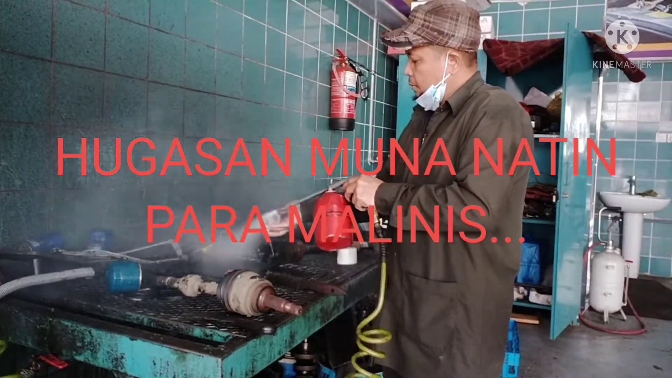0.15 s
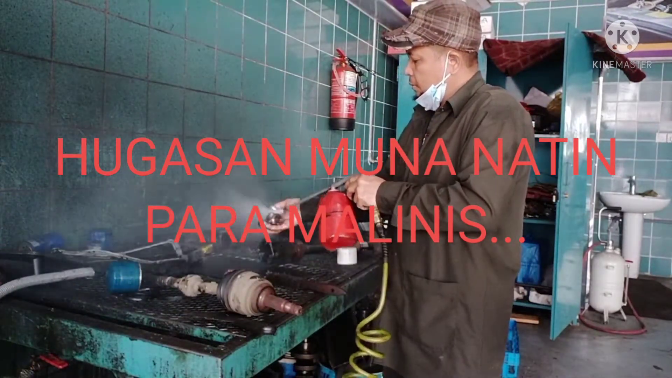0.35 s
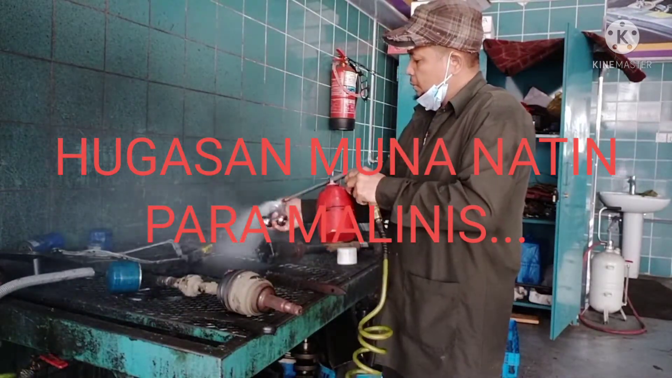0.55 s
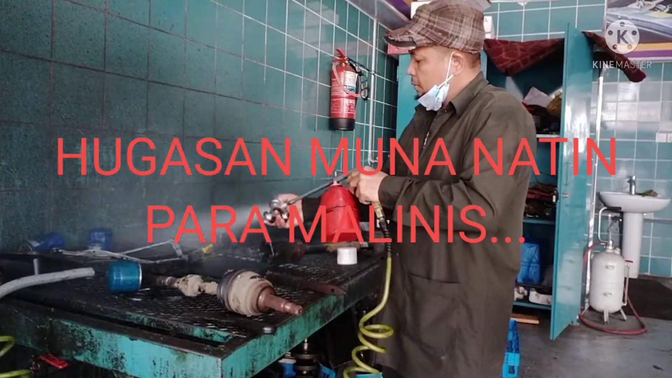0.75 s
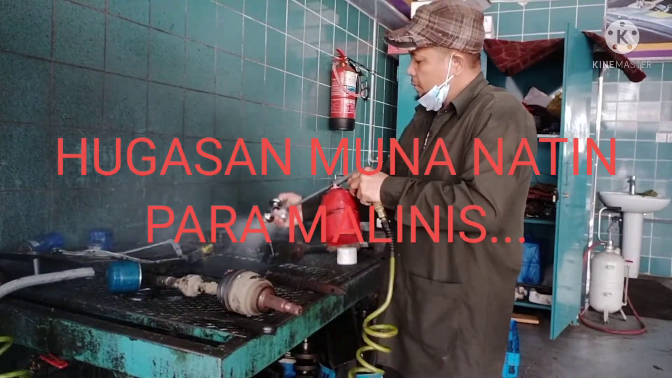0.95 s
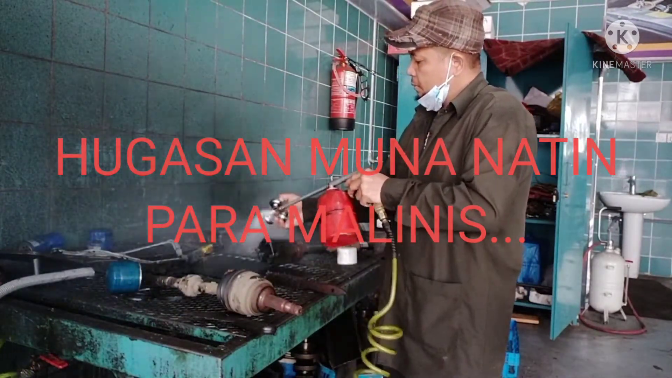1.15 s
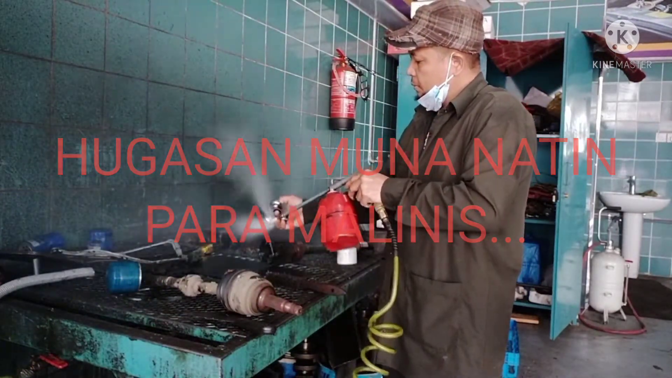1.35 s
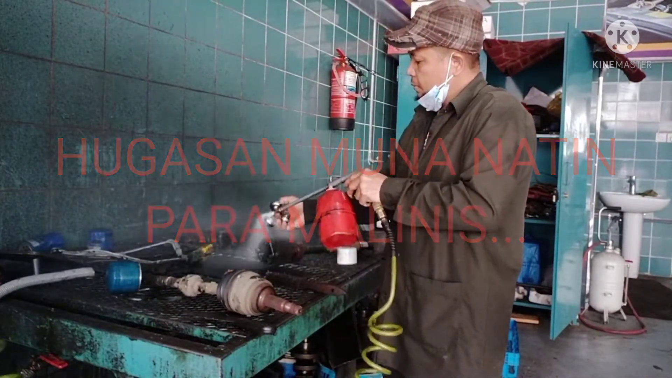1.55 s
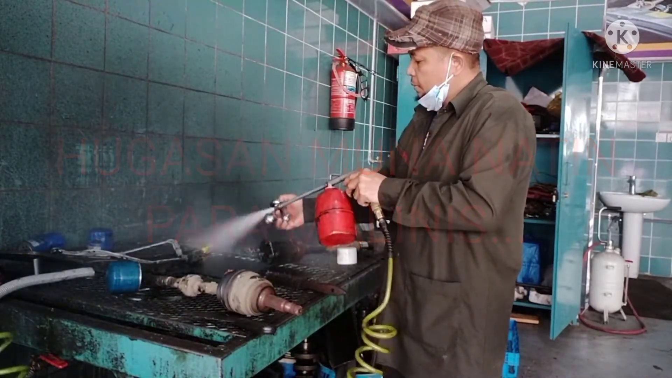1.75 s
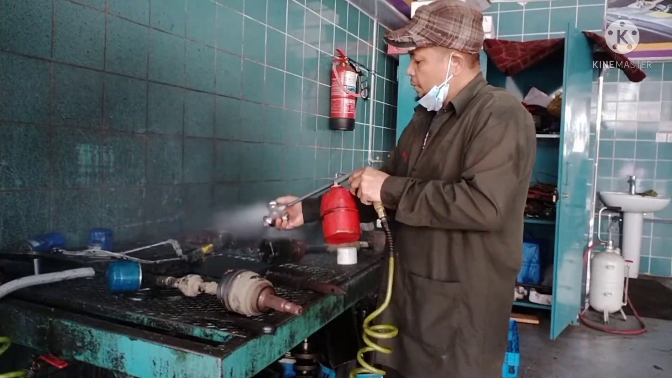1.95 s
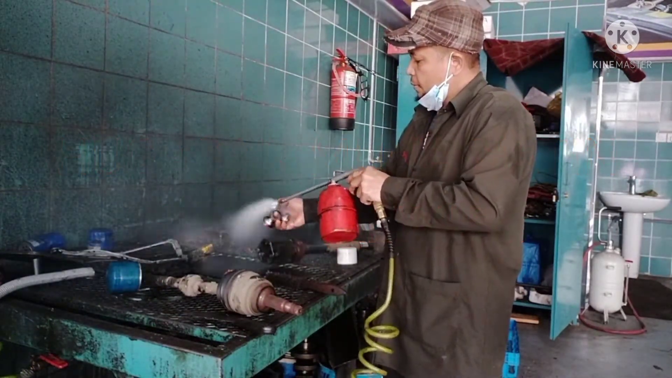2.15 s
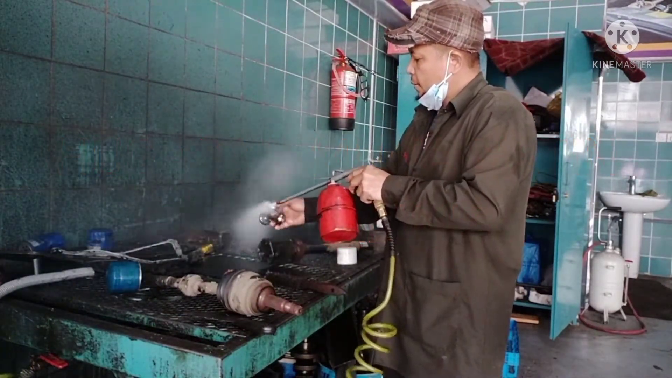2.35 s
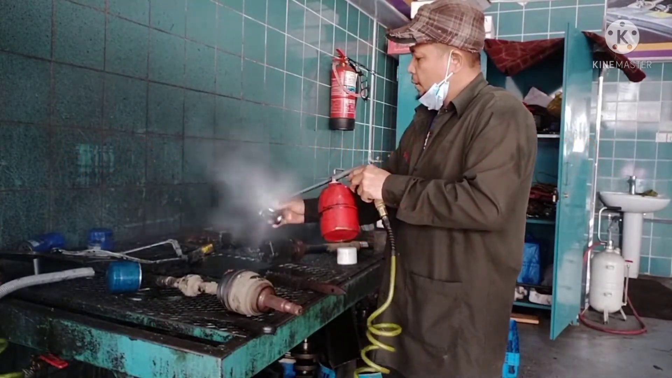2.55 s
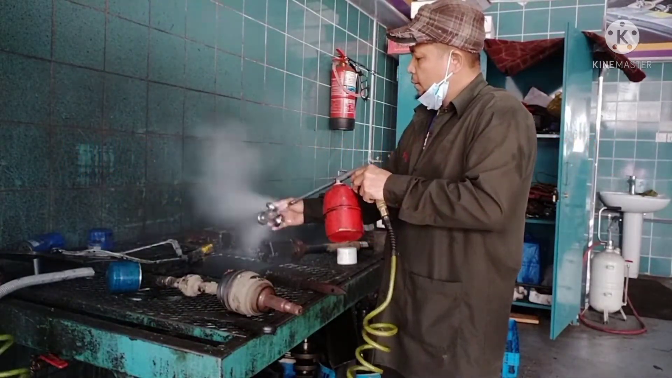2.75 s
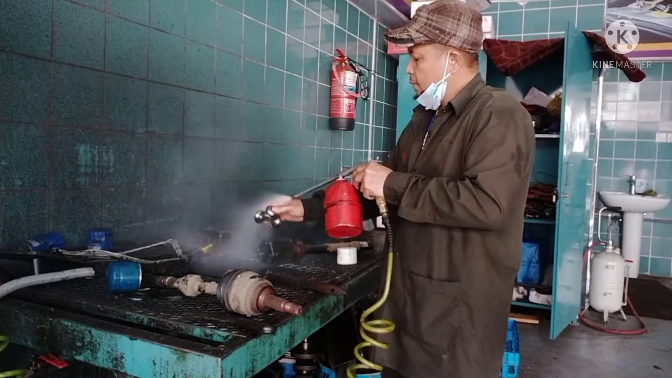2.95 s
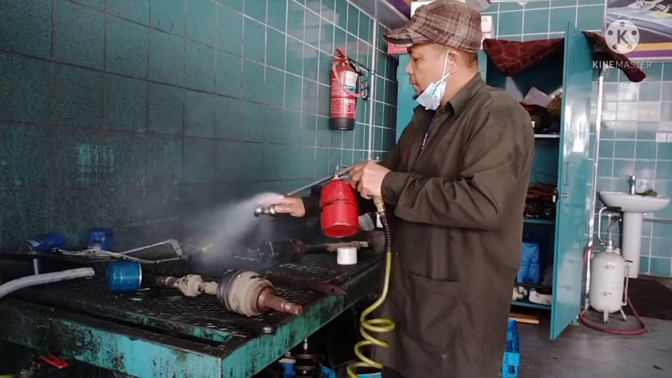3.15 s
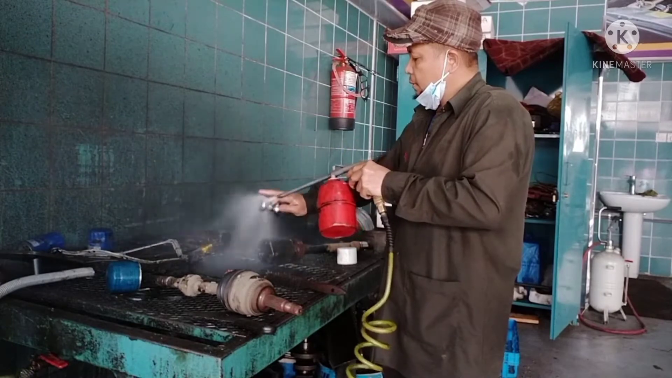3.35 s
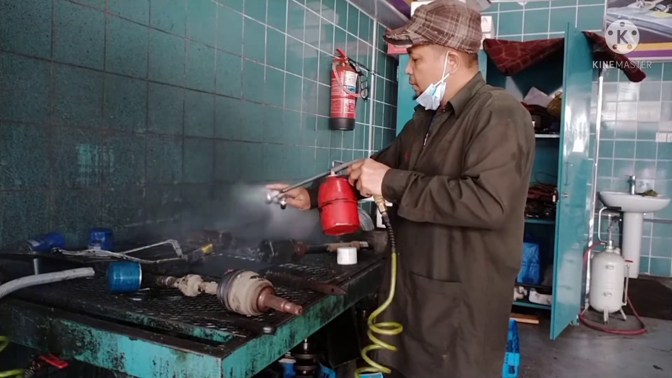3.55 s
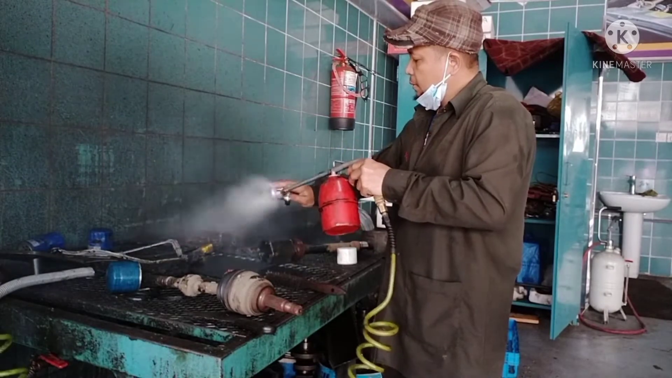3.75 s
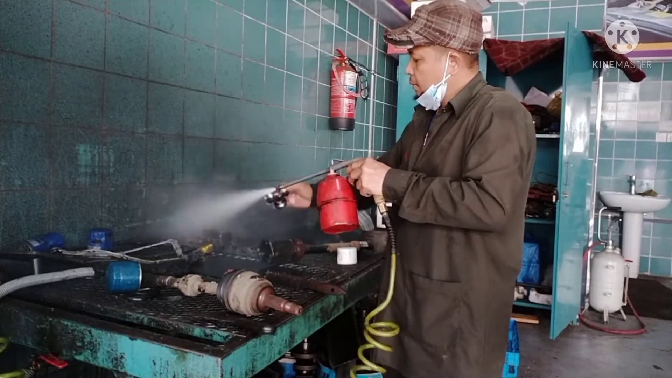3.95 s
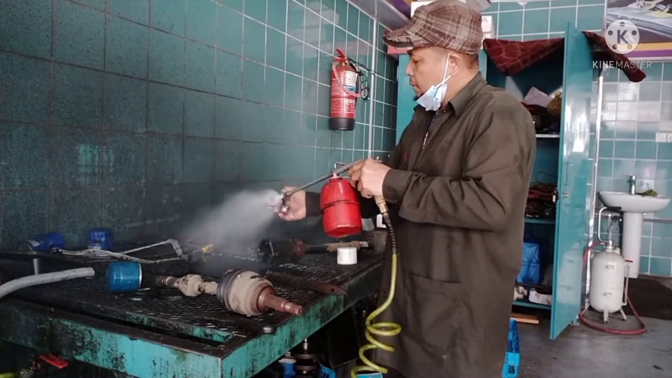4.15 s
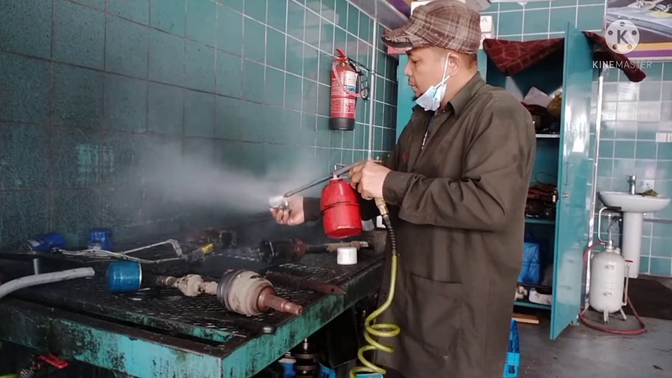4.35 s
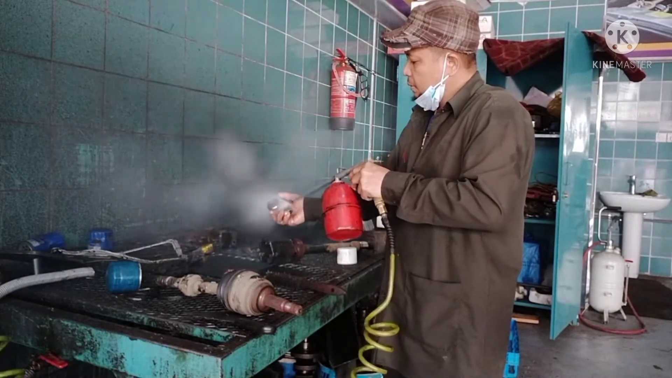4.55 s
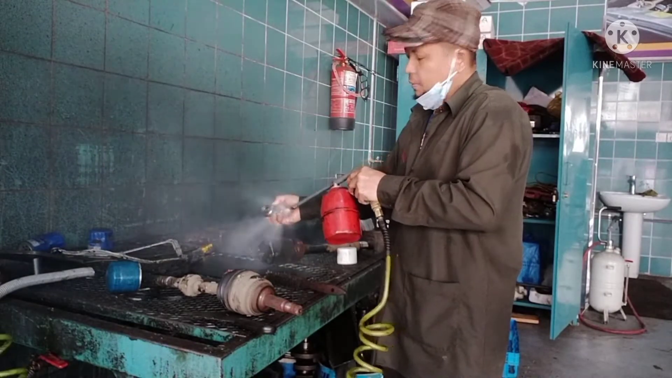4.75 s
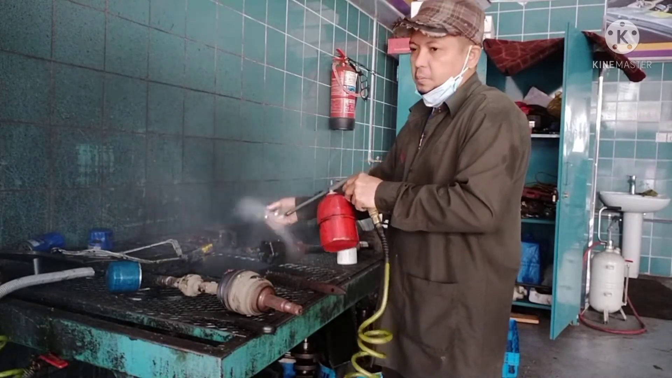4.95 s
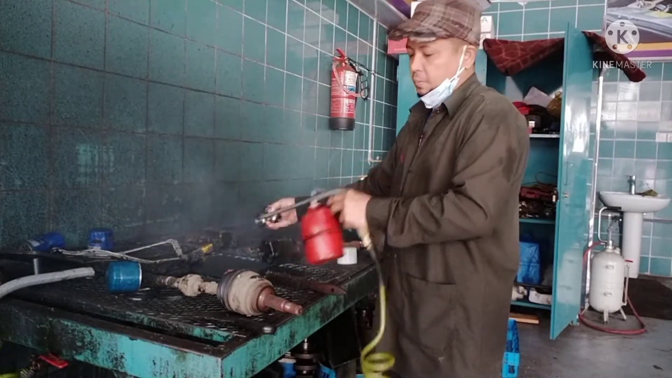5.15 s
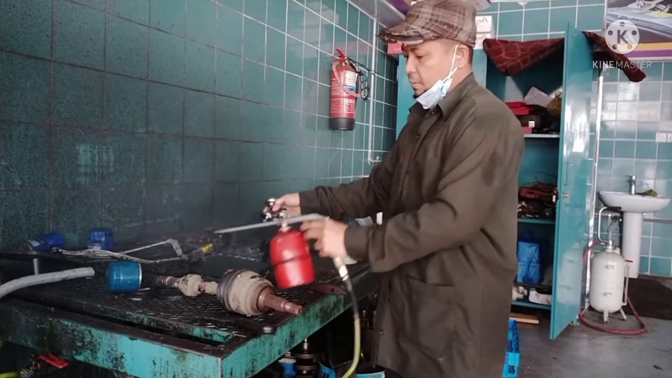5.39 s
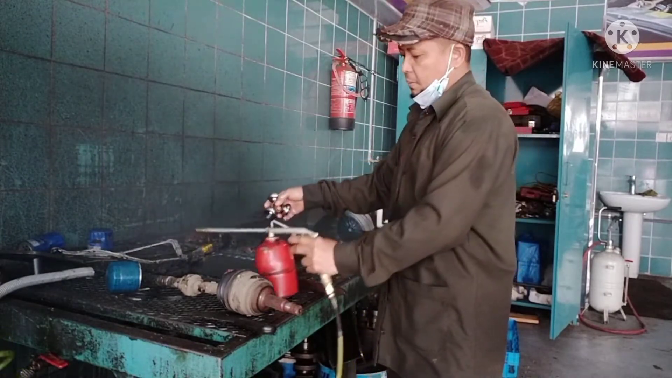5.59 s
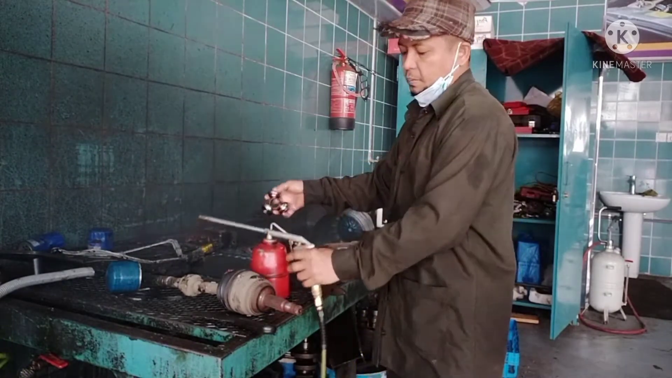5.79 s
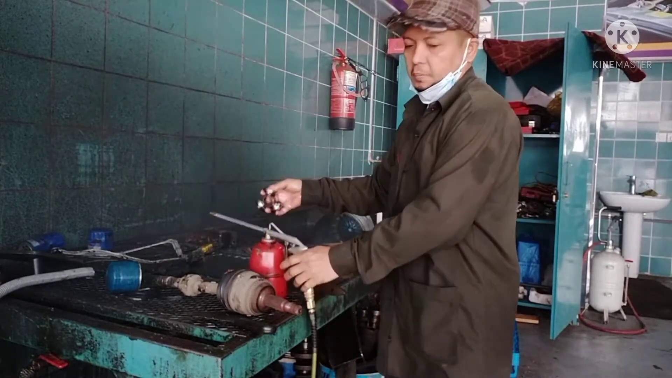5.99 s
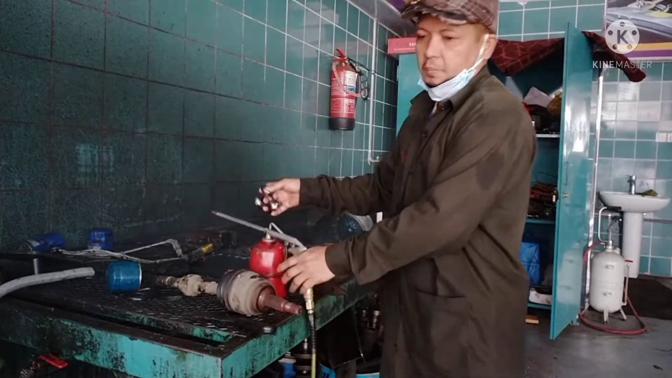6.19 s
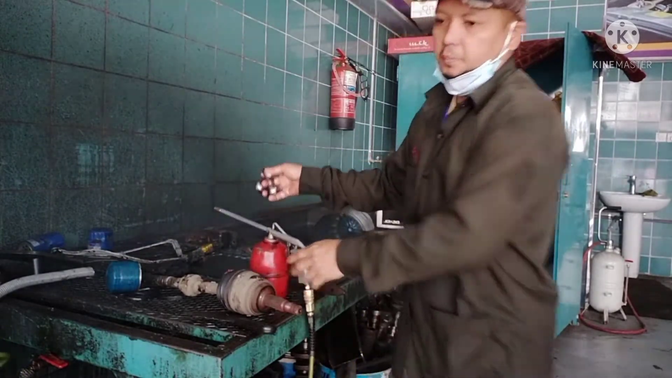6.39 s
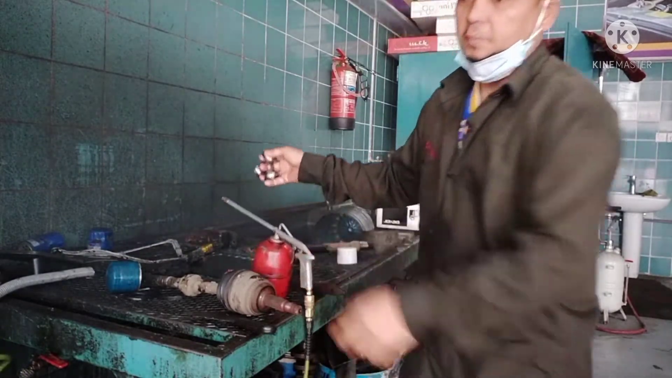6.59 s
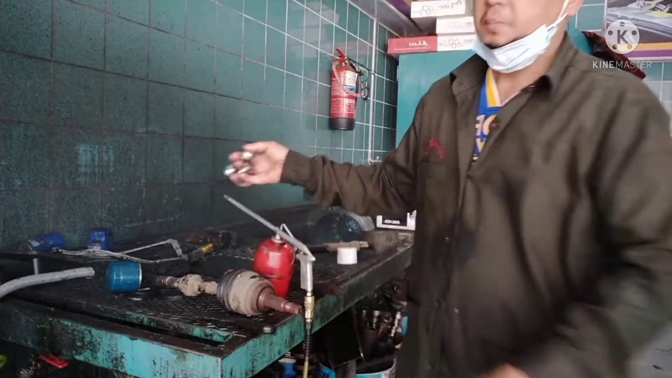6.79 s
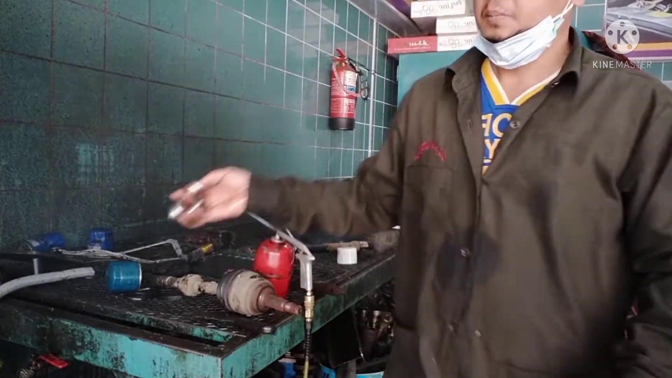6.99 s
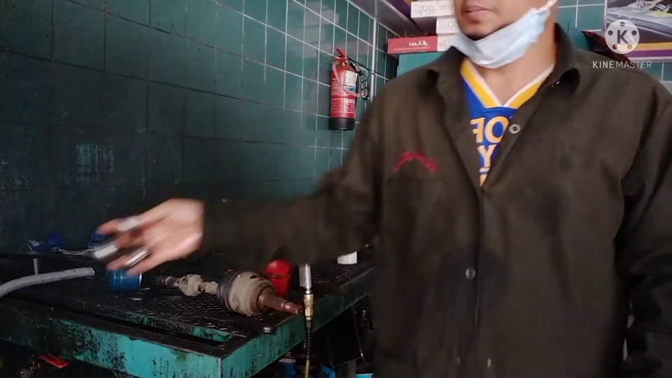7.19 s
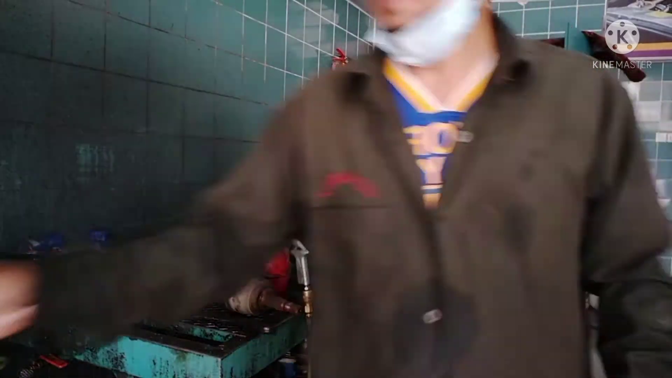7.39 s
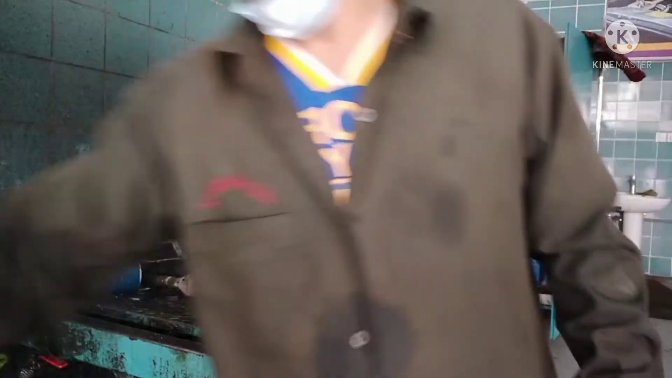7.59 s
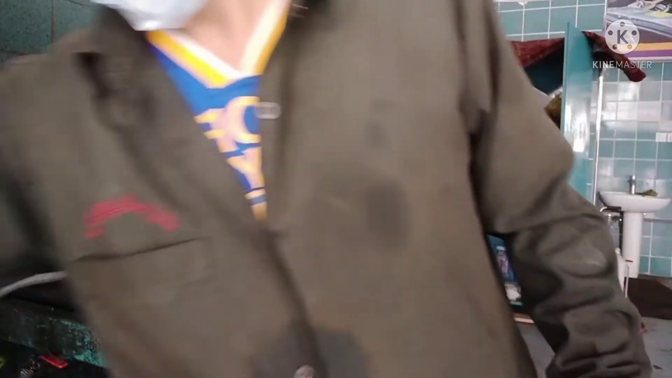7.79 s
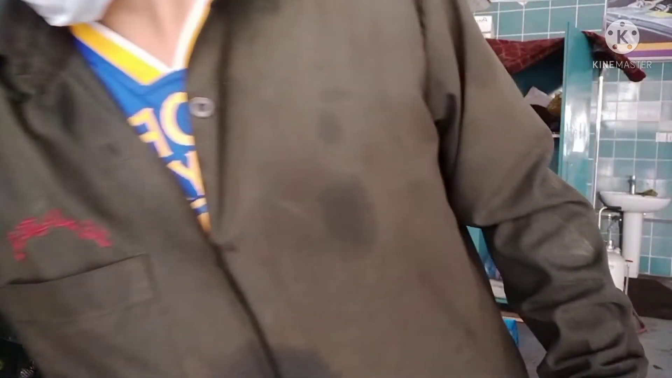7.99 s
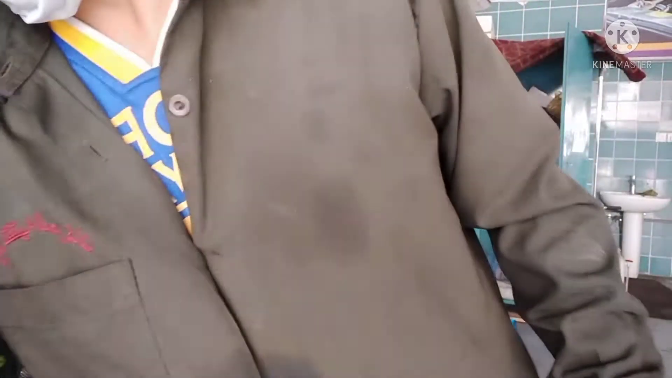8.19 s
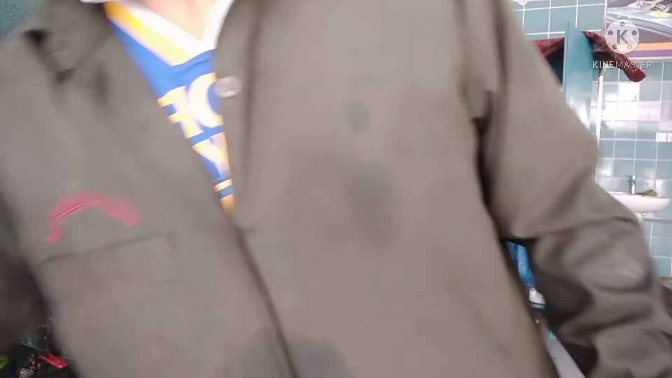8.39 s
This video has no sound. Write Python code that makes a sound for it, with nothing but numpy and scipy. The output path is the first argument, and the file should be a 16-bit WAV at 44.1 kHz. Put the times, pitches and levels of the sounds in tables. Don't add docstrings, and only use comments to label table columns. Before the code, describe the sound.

From the very start a compressed-air gun sprays liquid over small metal parts, close to the microphone in a tiled workshop. A loud, rough, broad roar carries a bright hiss on top. It flutters constantly, with quick dips as the jet slips off the parts, brief breathy howls from hollows, and hard droplet smacks, notably near 0.3, 1.7, 2.2 to 2.6 and 3.7 s. Around 3 s the roar thins for a moment, then surges again. At 4.9 to 5.2 s the trigger is released: a low, hollow puff booms through the hose and the roar collapses by about 5.7 s. A much quieter, thin, high leak hiss stays, with a faint fading whistle and slight wall echo over dull room air. Small spits swell and stop at 6.4 and 7.0 s. The hiss then turns slightly coloured by a nearby body, and a faint low motor hum rises and fades at 7.5 to 8.3 s.

```python
import sys
import numpy as np
from scipy import signal
from scipy.fft import rfft, irfft, next_fast_len
from scipy.io import wavfile
from scipy.ndimage import uniform_filter1d, map_coordinates

SR = 44100
rng = np.random.default_rng(int(sys.argv[2]) if len(sys.argv) > 2 else 0)


def generate_wav(signal):
    frames = np.transpose(np.atleast_2d(signal))
    scaled = np.clip(frames, -1, 1) * 32767
    pcm = np.round(scaled).astype(np.int16)
    wavfile.write(sys.argv[1], SR, pcm)


def gain_from_db(level_db):
    decades = np.asarray(level_db, float) / 20
    return 10 ** decades


N = 371763


def in_time(rows):
    seconds, *columns = np.transpose(rows)
    return [np.interp(np.arange(N) / SR, seconds, column) for column in columns]


def rms_one(x):
    return x / np.sqrt(np.mean(x ** 2) + 1e-20)


def drift(rate_hz):
    pole = np.exp(-40 * np.pi * rate_hz / SR)
    draws = rng.standard_normal(N // 20 + 3002)
    slow = signal.lfilter([1], [1, -2 * pole, pole ** 2], draws)[3000:]
    return np.interp(np.arange(N) / 20, np.arange(len(slow)), rms_one(slow))


def resonate(x, hz, width_hz):
    radius = np.exp(-np.pi * width_hz / SR)
    feed = np.array([1, 0, -1]) * (1 - radius ** 2) / 2
    return signal.lfilter(feed, [1, -2 * radius * np.cos(2 * np.pi * hz / SR), radius ** 2], x)


def bumps(rows):
    t, out_db = np.arange(N) / SR, np.zeros(N)
    for s, db, length in rows:
        near = slice(max(int((s - 2 * length) * SR), 0), int((s + 2 * length) * SR))
        out_db[near] += db * np.exp(-4 * np.log(2) * ((t[near] - s) / length) ** 2)
    return out_db


def air_noise(colour, tilt_hz, tilts_db, patchy_db, patch_rate, count):
    size = next_fast_len(N)
    log_hz = np.log(np.arange(size // 2 + 1) * SR / size + 1)
    hz, colour_db = np.transpose(colour)
    spectrum = rfft(rng.standard_normal(size)) * gain_from_db(np.interp(log_hz, np.log(hz), colour_db, -90))
    spectrum /= np.std(irfft(spectrum, size))
    centres = np.linspace(np.log(hz[0]), np.log(hz[-1]), count)
    out = np.zeros(N)
    for k, centre in enumerate(centres):
        triangle = np.interp(log_hz, centres, np.arange(count) == k)
        band = irfft(spectrum * triangle, size)[:N]
        shares = [np.interp(centre, np.log(tilt_hz), row) for row in np.eye(len(tilt_hz))]
        tilt_db = sum(share * (curve - np.mean(curve)) for share, curve in zip(shares, tilts_db))
        out += band * gain_from_db(tilt_db + patchy_db * drift(patch_rate))
    return out


# frequency in Hz, density in dB per Hz.
ROAR_COLOUR = [(15, -31), (25, 5), (38, -5), (291, -3.5), (565, -2), (2240, 1.5), (2880, 0), (5230, -10.5),
               (6000, -11), (7800, -14.5), (13200, -120)]
# time in seconds, roar level in dB, edge sharpness in dB.
STRIKE = [(0, -30.5, -1), (.2, -27.5, -0.5), (.5, -34, -1.5), (.63, -29, 0), (1.0, -32, 1.5),
          (1.38, -30, -1.5), (1.85, -28.5, -3), (2.15, -33.5, -0.5), (2.5, -29.5, -1), (2.95, -38.5, 3),
          (3.15, -35.5, 1.5), (3.3, -31.5, -0.5), (3.72, -27, -4), (4.3, -31, 1), (4.7, -31.5, 0.5),
          (5.05, -32.5, 0.5), (5.3, -38, -8), (5.75, -66.5, 21)]
# centre in seconds, depth in dB, length in seconds.
SLIPS = [(0.152, 5.5, 0.076), (0.481, 1.5, 0.24), (0.545, 1.5, 0.04), (0.867, 10, 0.049), (0.968, 3, 0.032),
         (1.076, 2, 0.028), (1.184, 2.5, 0.074), (1.46, 1.5, 0.06), (1.547, 3.5, 0.049), (1.66, 6.5, 0.091),
         (1.765, 3.5, 0.037), (2.07, 4, 0.1), (2.283, 2.0, 0.015), (2.371, 6.5, 0.048), (2.588, 8.5, 0.044),
         (2.712, 4.5, 0.022), (2.752, 4, 0.033), (2.862, 8, 0.049), (2.935, 10, 0.038), (3.108, 10, 0.07),
         (3.513, 6, 0.068), (3.63, 4, 0.12), (3.825, 9.5, 0.1), (4.008, 4, 0.14), (4.256, 1.5, 0.036),
         (4.563, 1.5, 0.081), (4.745, 0.5, 0.03), (4.812, 3, 0.039), (4.914, 4.5, 0.046)]
# centre in seconds, loss in dB, length in seconds.
SHADES = [(0.42, 3, 0.27), (0.698, 2.9, 0.048), (0.871, 3.7, 0.036), (0.957, 5.0, 0.027), (1.154, 3, 0.057),
          (1.289, 3.1, 0.063), (1.53, 2.5, 0.061), (1.657, 0, 0.029), (1.932, 6, 0.062), (2.063, 3, 0.057),
          (2.603, 1.5, 0.055), (2.712, 3, 0.019), (2.91, 7, 0.1), (3.101, 5, 0.11), (3.173, 11, 0.02),
          (3.467, 5, 0.043), (3.585, 2.8, 0.037), (3.808, 0.5, 0.16), (4.002, 4.5, 0.094),
          (4.382, -0.5, 0.046), (4.523, 3.5, 0.122), (5.3, 5.5, 0.19), (7.75, 2, 0.1), (8.02, 2.5, 0.06)]
SLIP_SHARES = {"rumble": 0.23, "upper": -0.43, "bright": -0.72, "five": 0.17, "eight": 0.13, "top": .13,
               "room": 0.55}
EDGE_SHARES = {"rumble": -0.34, "upper": 0.6, "bright": 1.16}
SHADE_SHARES = {"bright": 0.23, "five": 1.7, "eight": 0.78, "top": 0.19}


def splash():
    roar_db, edge_db = in_time(STRIKE + [(6.1, -56, 0)])
    slip_db = 1.39 * bumps(SLIPS)
    lumps_db = 0.5 * drift(45) + 1.5 * drift(210)
    rumble_db, upper_db, bright_db = (EDGE_SHARES[part] * edge_db - SLIP_SHARES[part] * slip_db
                                      for part in ("rumble", "upper", "bright"))
    bright_db = bright_db - SHADE_SHARES["bright"] * bumps(SHADES)
    noise = air_noise(ROAR_COLOUR, [250, 1100, 2600, 3900], [rumble_db, np.zeros(N), upper_db, bright_db],
                      patchy_db=1.04, patch_rate=7.6, count=22)
    return gain_from_db(roar_db - slip_db + 1.0 + lumps_db) * noise


def echo(x, rows, above_hz):
    path_ms, strength = in_time(rows)
    highs = signal.lfilter(*signal.butter(1, above_hz, "high", fs=SR), x)
    late = map_coordinates(highs, [np.arange(N) - path_ms * SR / 1000], order=3)
    return (x + strength * late) / np.sqrt(1 + strength ** 2)


# frequency in Hz, density in dB per Hz.
HISS_COLOUR = [(2180, -19), (3700, -17.5), (4380, -15.5), (5400, -18.5), (6610, -14.5), (7190, -11),
               (7770, -8.5), (8400, -6.5), (9140, -11), (10200, -9.5), (12000, -9), (14900, -2),
               (15500, -2)]
# time in seconds, hiss level in dB, aim at the microphone in dB.
NOZZLE = [(0, -28.5, -0.5), (.4, -28, -0.5), (.75, -30, 2.5), (1.15, -29, -2.5), (1.8, -29.5, 2.5),
          (2.1, -28.5, -1), (2.95, -30, 0.5), (3.3, -28.5, -0.5), (4.9, -29, 0.5), (4.95, -35.5, 2),
          (5.1, -33, -2.5), (5.32, -32, -1), (5.5, -32.5, -1.5), (5.9, -33.5, -4), (6.95, -33.5, -3.5),
          (7.1, -35.5, -3.5), (7.36, -33.5, -3.5), (8.43, -34.5, -4)]
AIM_SHARES = {"five": 1.63, "eight": 1.16}
# centre in seconds, gain in dB, length in seconds.
FLICKS = [(0.09, 2.5, 0.042), (0.238, 1.9, 0.045), (0.364, 1, 0.054), (0.488, 1, 0.039), (0.809, 1, 0.04),
          (0.9, 1, 0.036), (1.012, 2.0, 0.066), (1.227, 1, 0.029), (1.336, 2, 0.13), (1.84, 1.5, 0.041),
          (2.317, 1, 0.1), (2.792, 1.5, 0.1), (3.0, 0.5, 0.057), (3.215, -1, 0.023), (3.442, 1.5, 0.088),
          (3.543, 0, 0.046), (4.04, 1, 0.043), (4.15, 3, 0.052), (4.436, 2.5, 0.041), (4.626, 3, 0.067),
          (4.748, 1, 0.048), (5.56, 1.5, 0.15), (6.165, 1.5, 0.055), (6.587, 1.9, 0.13), (7.364, 2.2, 0.03),
          (7.52, 1, 0.19), (7.906, 1, 0.056)]
# time in seconds, extra path in milliseconds, strength 0 to 1.
HAND_ECHO = [(0, 0.25, 0.07), (1.5, 1, 0.06), (3.3, 0.27, 0.15), (4.6, 0.61, 0), (5.2, 0.6, 0),
             (6.5, 0.53, 0.07), (7.05, 0.55, 0.01), (7.3, .62, 0.04), (8.43, .62, 0.07)]
WALL_ECHO = [
    (5, 2.8, 0),
    (5.15, 2.8, .24),
    (5.65, 3.15, .26),
    (6.5, 3.1, .22),
    (6.9, 3.05, 0),
]
BODY_ECHO = [
    (6.98, 1.03, 0),
    (7.2, 1.005, .26),
    (7.8, 1.0, .23),
    (8.43, 1.004, .3),
]


def nozzle():
    hiss_db, aim_db = in_time(NOZZLE)
    slip_db, shade_db = bumps(SLIPS), bumps(SHADES)
    five_db, eight_db = (AIM_SHARES[part] * aim_db - SLIP_SHARES[part] * slip_db - SHADE_SHARES[part] * shade_db
                         for part in ("five", "eight"))
    top_db = -SLIP_SHARES["top"] * slip_db - SHADE_SHARES["top"] * shade_db
    noise = air_noise(HISS_COLOUR, [5000, 8300, 11500], [five_db, eight_db, top_db],
                      patchy_db=1.08, patch_rate=9.3, count=16)
    hiss = gain_from_db(hiss_db + bumps(FLICKS) + 4.5 + 0.64 * drift(27)) * noise
    hiss = echo(hiss, HAND_ECHO, above_hz=1500)
    hiss = echo(hiss, WALL_ECHO, above_hz=500)
    return echo(hiss, BODY_ECHO, above_hz=5000)


# frequency in Hz, density in dB per Hz.
SHOP_COLOUR = [(12, -18), (20, 4), (75, -6), (124, -2.5), (151, -7), (260, -7), (296, -10), (419, -11),
               (606, -10), (1300, -9), (1920, -16), (3600, -19), (4680, -62), (7920, -120)]
# time in seconds, level in dB, nearness of the worker in dB.
SHOP_AIR = [(0, -53.5, 6.5), (5.0, -52, 0), (5.5, -46, 6.5), (5.8, -49, 0.5), (6.35, -48.5, 0),
            (6.8, -50, 0.5), (7.12, -50, 0.5), (7.38, -46, 2), (8.05, -49, 0), (8.43, -46.5, 1)]
NEAR_SHARES = {"low": 0.6, "upper": 0.27, "shelf": 1.1}


def shop():
    level_db, near_db = in_time(SHOP_AIR)
    low_db, upper_db, shelf_db = (NEAR_SHARES[part] * near_db for part in ("low", "upper", "shelf"))
    flat_db = np.zeros(N)
    noise = air_noise(SHOP_COLOUR, [300, 700, 1200, 2000, 3000], [low_db, flat_db, flat_db, upper_db, shelf_db],
                      patchy_db=-1.3, patch_rate=9.2, count=20)
    return gain_from_db(level_db + 6.0 - SLIP_SHARES["room"] * bumps(SLIPS)) * noise


def pressure(roar):
    draught_s, rise_s, height = 4.912, 0.055, 0.26
    t = np.arange(N) / SR
    age = np.maximum(t - draught_s, 0) / rise_s
    push = height * age ** 2 * np.exp(-age)
    strength = uniform_filter1d(uniform_filter1d(np.abs(roar), size=1000), size=1000)
    spraying = np.clip((draught_s - t) * 10, 0, 1)
    sag = -1.1 * (strength - np.mean(strength[:SR])) * spraying
    keep = np.exp(-2 * np.pi * 0.72 / SR)
    earlier_gust = 0.028 * np.exp(-(t / 0.16) ** 2)
    return signal.lfilter([1, -2, 1], [1, -2 * keep, keep ** 2], push + sag) + earlier_gust


# time in seconds, low edge in Hz.
EAR_PATCHES = [(.087, 9500), (1.991, 4200), (1.991, 10940), (2.107, 5200), (2.758, 4900), (2.758, 8850),
               (2.827, 4570), (4.313, 5620), (4.36, 5130), (4.36, 7450), (4.522, 10230), (4.963, 11630),
               (5.381, 12400), (5.637, 4570), (5.637, 7490), (5.869, 4100), (5.869, 6200), (6.032, 4630),
               (6.171, 10100), (6.357, 8870), (6.403, 10940), (6.635, 5060), (6.635, 10250), (6.868, 8230),
               (6.891, 8800), (7.425, 8890), (7.448, 10960), (7.68, 5100), (7.68, 9560), (7.773, 5900)]


def ear_noise(mono):
    length, first = 2048, 777
    half = length // 2
    out, lines = np.zeros(N), np.arange(half) + 0.5
    steps = np.arange(length) + 0.5
    window = np.sin(np.pi * steps / length)
    waves = window * np.cos(np.pi / half * np.outer(lines, steps + half / 2))
    hz = lines * SR / length
    draws = rng.standard_normal((len(EAR_PATCHES), half))
    for (s, low_hz), sizes in zip(EAR_PATCHES, draws):
        at = first + half * round((s * SR - first) / half - 1)
        band = (hz > low_hz) * (hz < low_hz * 1.225)
        strength = np.std((waves @ mono[at:at + length])[band > 0])
        out[at:at + length] += gain_from_db(-5) * strength * 2 / half * (sizes * band) @ waves
    return out * np.array([[1], [-1]])


# centre in seconds, pitch in Hz, level in dB, length in seconds.
HOWLS = [(.1, 2700, -37, .15), (.68, 2400, -41, 0.12), (.9, 4450, -37, 0.046), (1.857, 2600, -40, 0.064),
         (2.017, 2300, -36, 0.045), (2.664, 2200, -35.5, .05), (3.207, 4300, -38, 0.032),
         (3.71, 2200, -44, 0.052), (3.923, 4100, -37, 0.05), (4.22, 6450, -38, .15),
         (4.67, 2780, -36.5, 0.07), (5.068, 2340, -35.5, 0.13)]


def howls():
    t, white, out = np.arange(N) / SR, rng.standard_normal(N), np.zeros(N)
    for s, hz, db, length in HOWLS:
        width_hz = 0.34 * hz
        ringing = rms_one(resonate(resonate(white, hz, width_hz), hz, width_hz))
        out += gain_from_db(db) * np.exp(-2 * ((t - s) / length) ** 2) * ringing
    return out


# time in seconds, peak in dB.
SMACKS = [(0.2734, -10), (0.6007, -15), (0.6665, -18), (1.4513, -23), (1.7036, -10), (2.213, -12),
          (2.3134, -12), (2.4076, -21), (2.647, -12), (3.7064, -9), (4.6131, -16), (4.867, -26)]


def smacks():
    clicks = np.zeros(N) + 1e-18
    s, peak_db = np.transpose(SMACKS)
    clicks[(s * SR).astype(int)] = gain_from_db(peak_db + 17)
    return resonate(clicks, hz=2300, width_hz=700)


# time in seconds, level in dB.
COUGH = [(4.72, -70), (4.78, -35), (4.83, -38), (4.92, -38), (5.0, -27), (5.07, -26), (5.15, -33),
         (5.35, -40.5), (5.6, -43)]
# frequency in Hz, width in Hz, level in dB.
COUGH_MODES = [(146.4, 22, -0.5), (237, 110, 6.5), (275, 46, -6.5), (325, 29, 3), (418, 43, 8),
               (499, 18, -6), (880, 75, 10.5)]


def cough():
    white = rng.standard_normal(N)
    modes = sum(gain_from_db(db) * rms_one(resonate(white, hz, width)) for hz, width, db in COUGH_MODES)
    lows = signal.sosfilt(signal.butter(6, 600, fs=SR, output="sos"), modes)
    level_db, = in_time(COUGH + [(5.4, -72)])
    return gain_from_db(level_db) * rms_one(lows + gain_from_db(-8) * modes)


# time in seconds, level in dB.
WHISTLE = [(5.12, -58), (5.22, -41), (5.33, -50), (5.47, -45), (5.7, -48), (6.0, -52), (6.4, -56),
           (6.8, -61), (7.2, -56)]


def whistle():
    hz, width_hz = 1292, 50
    ringing = resonate(resonate(rng.standard_normal(N), hz, width_hz), hz, width_hz)
    level_db, = in_time([(5.05, -90)] + WHISTLE + [(7.2, -75)])
    return gain_from_db(level_db) * rms_one(ringing)


# stop in seconds, peak in dB, swell in seconds.
SPITS = [
    (6.445, -37, 0.04),
    (6.98, -47, 0.076),
]


def spits():
    dip_db, recover_s = -7.5, 0.091
    t, gain = np.arange(N) / SR, np.ones(N)
    for stop, peak_db, swell in SPITS:
        strength = gain_from_db(peak_db + 31)
        away = np.abs(t - stop)
        rise = 1 + strength * np.exp(-away / swell)
        dip = gain_from_db(strength * dip_db * np.exp(-away / recover_s))
        gain *= np.where(t < stop, rise, dip)
    return gain


# time in seconds, pitch in Hz, level in dB.
HUM = [
    (7.4, 124.5, -63),
    (7.5, 128.3, -52.5),
    (7.8, 126, -46.5),
    (8.1, 126.5, -49.5),
    (8.25, 127, -58),
]


def hum():
    (start, first_hz, _), (end, last_hz, _) = HUM[0], HUM[-1]
    hz, level_db = in_time([(start - 0.06, first_hz, -90)] + list(HUM) + [(end + 0.1, last_hz, -90)])
    phase = 2 * np.pi * np.cumsum(hz + 1.5 * drift(4.4)) / SR
    return np.sqrt(2) * gain_from_db(level_db + 1.0 * drift(4.4)) * np.sin(phase)


def scene():
    roar = splash()
    idle_air = spits() * (nozzle() + shop() + whistle())
    mono = roar + idle_air + pressure(roar) + howls() + smacks() + cough() + hum()
    return np.array([mono, mono])


def band_limit(x):
    return signal.sosfilt(signal.butter(12, 16860, fs=SR, output="sos"), x)


def record(dry):
    rounded = 0.42 * np.tanh(dry / 0.42)
    size = next_fast_len(N)
    passed = np.arange(size // 2 + 1) * SR / size < 15510
    cut = irfft(rfft(rounded, size) * passed, size)[:, :N]
    return band_limit(cut + ear_noise(cut[0]))


dry = scene()
out = record(dry)
generate_wav(out)
```